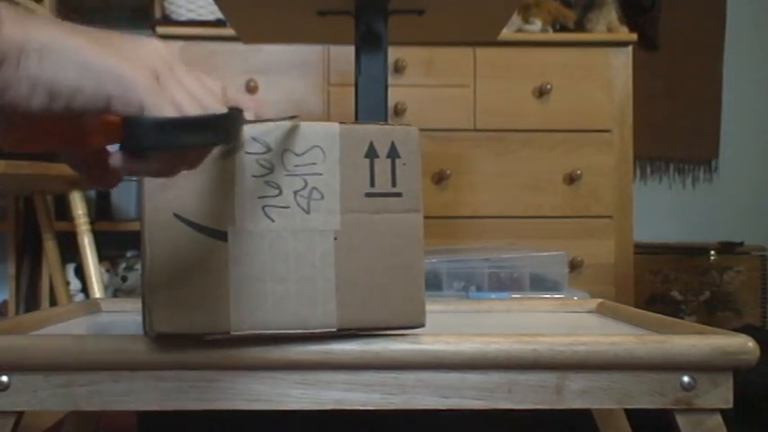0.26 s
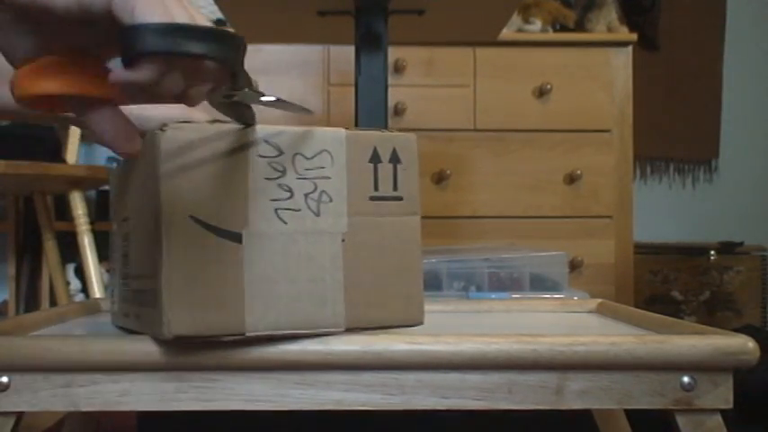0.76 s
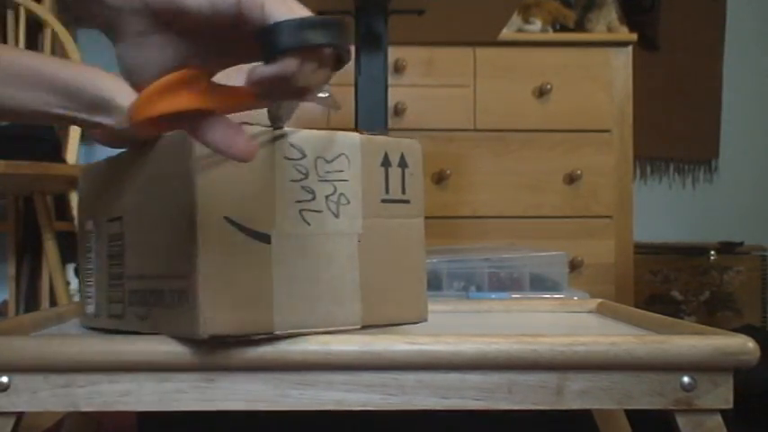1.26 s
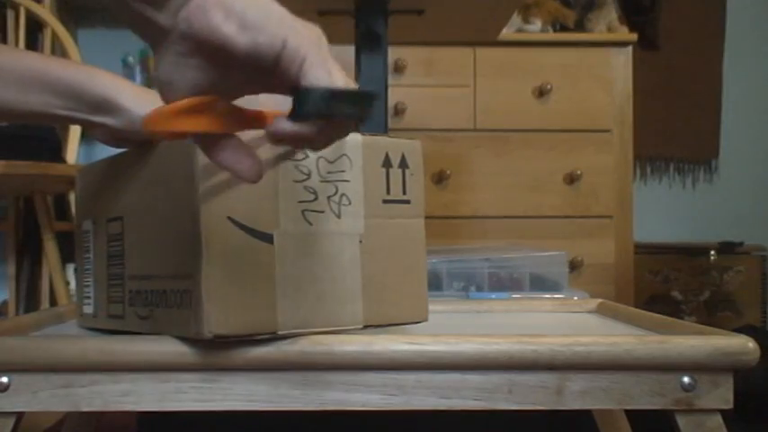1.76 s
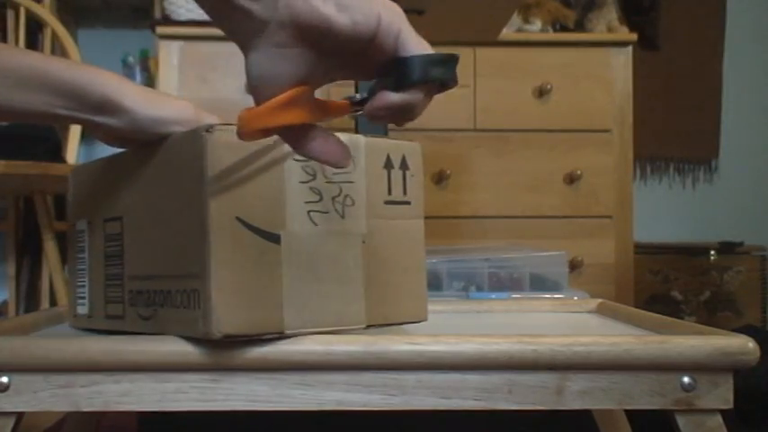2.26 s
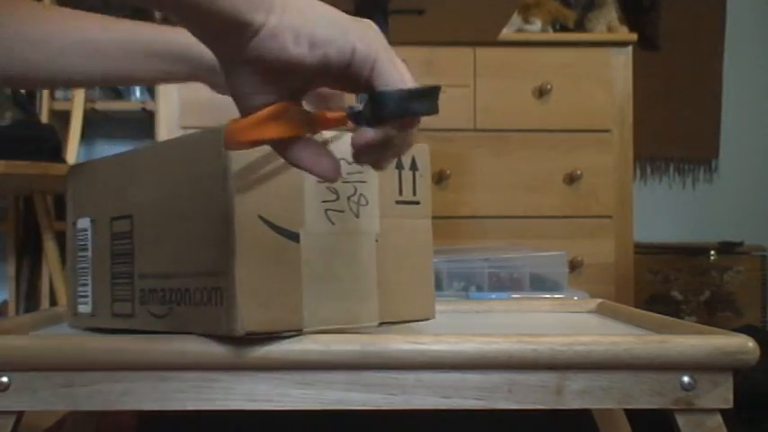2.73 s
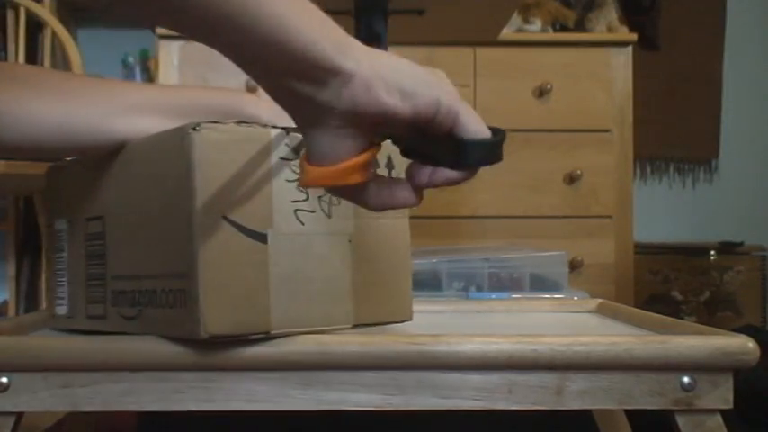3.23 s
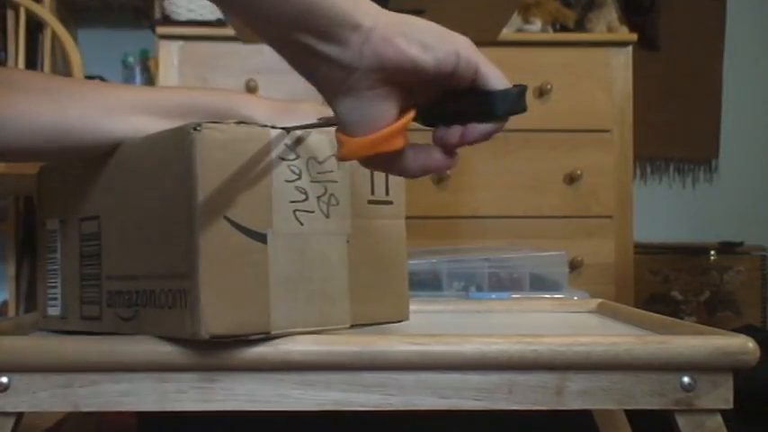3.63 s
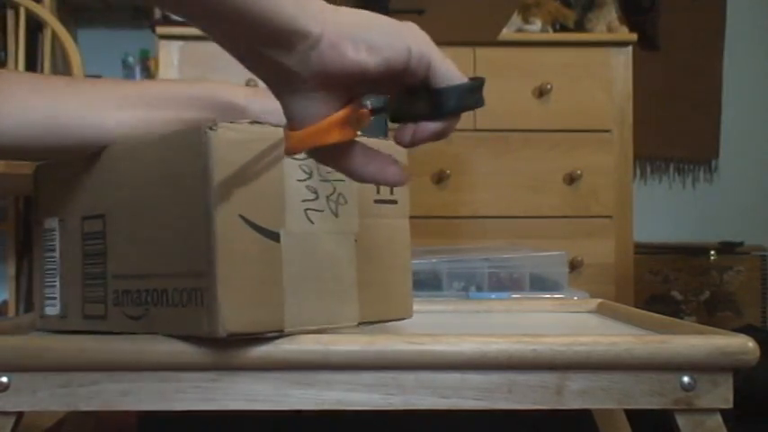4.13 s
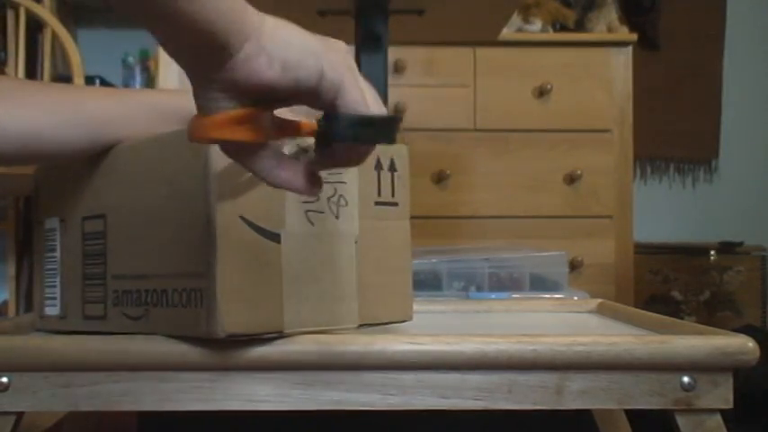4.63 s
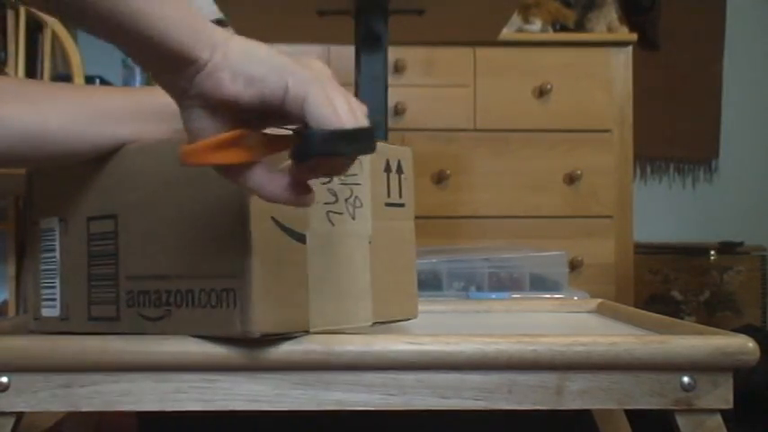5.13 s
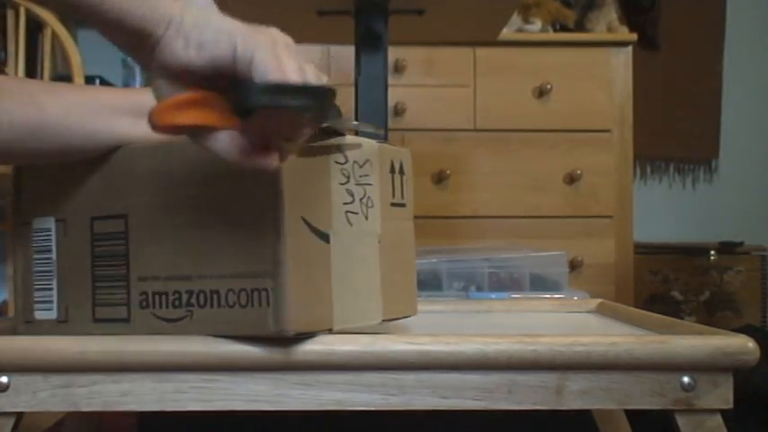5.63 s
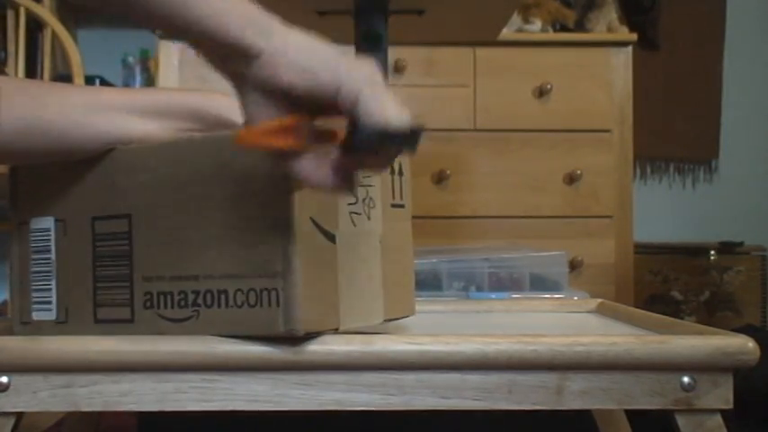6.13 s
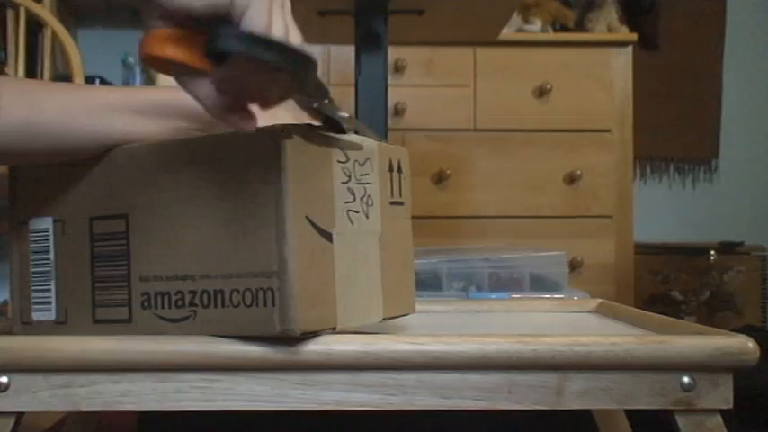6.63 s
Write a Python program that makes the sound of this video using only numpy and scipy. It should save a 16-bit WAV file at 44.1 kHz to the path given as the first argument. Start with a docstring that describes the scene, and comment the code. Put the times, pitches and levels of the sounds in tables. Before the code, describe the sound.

In a small quiet room, scissors work along the taped seam of a cardboard box on a wooden table. Hollow knocks and short rips come in uneven clusters, with a firm thump near the middle, then softer scrapes and hisses. Towards the end come crisp tape ticks, two small metallic clicks and the loudest knock. The microphone is close, with a faint low hush and a short room answer.

```python
"""In a small quiet room, a scissor blade works along the taped seam of a cardboard box on a wooden tray table.
The blade scrapes, catches and knocks the box, and slits the tape in short rips; the tape crackles,
the scissors click. Random grains and noise bursts, the forces of contact, ring filters for table,
box panels, edge, tape and steel. Each contact gets an answer from the room, over a steady hush."""
import sys
import numpy as np
from scipy import signal
from scipy.fft import rfft, irfft, next_fast_len
from scipy.io import wavfile
from scipy.ndimage import uniform_filter1d

SR = 44100
rng = np.random.default_rng(int(sys.argv[2]) if len(sys.argv) > 2 else 0)


def pcm_store(signal):
    """Save signal as 16-bit PCM."""
    levels = np.round(np.clip(np.atleast_2d(signal), -1, 1) * 32767)
    wavfile.write(sys.argv[1], SR, levels.astype(np.int16).T)


N = 303219  # length of the scene in samples
SIZE = 16384  # samples in one contact or one filter
T = np.arange(SIZE) / SR  # time within a contact, s
HZ = np.fft.rfftfreq(SIZE, 1 / SR)

# the blade catches and knocks the box: start_s, level_db (of the panels), panel_hz (strongest panel pitch),
# table_db (weight on the table, against the panels), sharp_db (edge and tape louder by this much)
BLADE_KNOCKS = [(0.012, -65.5, 258, 15.5, -7), (0.126, -58, 560, 1, -13), (0.644, -43.5, 373, -31, -8),
                (0.679, -44, 382, -9, -15), (0.726, -46, 420, -10, -6), (0.842, -45.5, 327, -3, 6),
                (0.985, -49, 530, -9, 3), (1.113, -44, 377, -4.5, -22), (1.135, -40, 393, -23, -20),
                (1.256, -44.5, 494, -3.5, -12), (1.439, -55.5, 340, 7, -2), (1.504, -53, 269, -15, 14.5),
                (1.889, -51, 290, 1.5, 7), (2.302, -40.5, 375, -4, 1), (2.511, -51, 323, 2.5, 8),
                (2.669, -58.5, 583, -6, 12), (2.855, -34, 266, -2.5, -5), (2.88, -35.5, 367, -18, -22),
                (3.935, -60, 700, -5, 13), (4.02, -56.5, 595, -0.5, 7), (4.172, -56, 358, -1.5, 14.5),
                (4.257, -50.5, 412, -4, -3), (4.383, -57, 526, 5.5, -12), (4.556, -60, 261, 2, 17),
                (4.665, -59.5, 290, 4.5, 6), (4.787, -57.5, 283, 9, 13), (5.246, -38, 540, 4.5, 14),
                (5.81, -48.5, 600, -16, -12), (5.886, -51, 520, -4.5, 3), (6.272, -46, 390, 3.5, -10),
                (6.471, -28, 414, -25, 1.5)]
# resonances of the box panels: pitch_hz, width_hz, level_db
PANEL_MODES = [(235, 32, 4), (292.5, 21, 3.5), (349.6, 21, 1), (382, 27.5, 2), (430, 30, -5.5),
               (507.4, 25, 0.5), (577, 12.5, -4), (616, 15, -36)]
# tone of the tape: pitch_hz, level_db (per Hz)
TAPE_TONE = [(1200, -8.5), (3000, 3), (4500, 4.5), (6300, 7.5), (9000, 4.5), (11000, 0), (14000, 7.5),
             (16500, 5)]
# tone of the fine, high fizz: pitch_hz, level_db (per Hz)
FIZZ_TONE = [(3000, -7.5), (9000, -4), (11500, -4.5), (13000, 4.5), (14500, 3.5), (16500, -7.5)]


def amp(db):
    """Turn decibels into a gain."""
    return 10 ** (np.asarray(db) / 20)


def unit(x):
    """Scale x to an average strength (rms) of 1."""
    return x / np.sqrt(np.mean(x ** 2) + 1e-20)


def along(points, hz):
    """Read a curve of (Hz, value) points on a logarithmic pitch axis."""
    point_hz, value = np.transpose(points)
    return np.interp(np.log(hz + 1), np.log(point_hz), value)


def filtered(x, gain):
    """Multiply x by a gain that depends on frequency."""
    n = x.shape[-1]
    padded = next_fast_len(n + SIZE)
    spectrum = rfft(x, padded) * gain(np.fft.rfftfreq(padded, 1 / SR))
    return irfft(spectrum, padded)[..., :n]


def stereo(pair, width):
    """Use two unrelated signals as middle and side; width sets how strong the side is at each pitch."""
    middle = pair[0]
    side = filtered(pair[1], lambda hz: amp(along(width, hz)))
    return np.array([middle + side, middle - side])


def air():
    """The room's steady hush: shaped noise that comes from all sides."""
    # tone of the hush: pitch_hz, level_db (per Hz, before the overall level is set)
    hush_tone = [(15, -36), (25, -22), (124, -4.5), (445, -10), (617, -8.5), (1090, -13), (1510, -14),
                 (1640, -16.5), (2270, -17), (3230, -24), (4600, -23.5), (8370, -26.5), (10700, -28),
                 (14000, -22.5), (16500, -29)]
    # stereo width of the hush: pitch_hz, side_db (side over middle)
    hush_width = [(50, -18), (130, -5), (220, -2.5), (520, 3.5), (1500, -1), (5000, -3), (10700, 3.5),
                  (11500, -24)]
    hush = filtered(rng.standard_normal((2, N)), lambda hz: amp(along(hush_tone, hz)))
    return amp(-56) * unit(stereo(hush, hush_width))


def colour(spectrum):
    """Make a short filter with the given tone that reacts only after it is struck (minimum phase)."""
    cepstrum = irfft(np.log(amp(along(spectrum, HZ))))
    # folding the second half onto the first leaves no sound before the strike
    fold = 1 + np.sign(SIZE // 2 - np.arange(SIZE))
    return irfft(np.exp(rfft(cepstrum * fold) - cepstrum[0]))


def body(modes, centre_hz, leak_hz, falloff_db=15):
    """Damped resonances: the place of contact favours those near centre_hz; little sounds below leak_hz."""
    ring = 0
    for hz, width, db in modes:
        # each octave away from the centre costs falloff_db
        strength = amp(db - falloff_db * abs(np.log2(hz / centre_hz)))
        damping = 1j * HZ * width
        ring = ring + strength * damping / (hz * hz - HZ * HZ + damping)
    radiated = (HZ / (HZ - 1j * leak_hz)) ** 2
    return irfft(ring * radiated)


def edge(spectrum, edge_hz, boost=0.78, q=2.6):
    """An edge of cardboard or steel has one main resonance, set by where it is touched."""
    damping = 1j * HZ * edge_hz
    resonance = boost * damping / (q * (edge_hz ** 2 - HZ ** 2) + damping)
    return irfft(rfft(colour(spectrum)) * (1 + resonance))


def room(wet_db, gap=0.0053):
    """Direct sound, then after a short gap (s) the dying answer of furniture and walls."""
    # how long the room rings: pitch_hz, decay_s (time to drop by 60 dB)
    room_decay = [(100, 0.23), (400, 0.24), (1500, 0.28), (5000, 0.27), (10000, 0.25), (16000, 0.18)]
    # stereo width of the answer: pitch_hz, side_db (side over middle); the bass is nearly mono
    room_width = [(60, -15), (250, -11), (500, -6), (1000, -7), (4000, -5), (8500, -1.5), (10500, -5),
                  (11500, -30)]
    hz, t, bands = signal.stft(rng.standard_normal((2, SIZE)), SR, nperseg=256)
    decay = amp(-60 * t / along(room_decay, hz)[:, None])
    tail = signal.istft(bands * decay, SR, nperseg=256)[1][:, :SIZE]
    tail = tail * np.clip(T / gap - .5, 0, 1)  # fades in around the gap
    direct = (T == 0)
    return direct + amp(wet_db) * stereo(unit(tail), room_width) / np.sqrt(SIZE)


def grains(n, rate, spread_db):
    """Tiny slips and fibre breaks of uneven size at random moments, about rate per second."""
    sizes = amp(spread_db * np.clip(rng.standard_normal(n), -2, 2))
    sizes = sizes * rng.choice([-1, 1], n)
    happens = rng.random(n) < rate / SR
    return unit(sizes * happens)


def add(out, s, force, parts, levels_db, wet_db):
    """Mix in one contact: the force rings each part to its level over the first 30 ms."""
    # double length, so that the end of the ringing does not wrap round to the start
    heard = rfft(force, 2 * SIZE) * rfft(room(wet_db), 2 * SIZE)
    start = max(round(s * SR), 0)
    onset = round(.03 * SR)
    for part, db in zip(parts, levels_db):
        ring = irfft(heard * rfft(part, 2 * SIZE))[:, :SIZE]
        gain = amp(db) / np.std(ring.mean(0)[:onset])
        out[:, start:start + SIZE] += (gain * ring)[:, :N - start]


def box_parts(table_hz, panel_hz, edge_hz):
    """What a contact shakes: table, box panels, cardboard edge, tape."""
    # resonances of the wooden table: pitch_hz, width_hz, level_db
    table_modes = [(103.6, 28, 2.5), (127.3, 21, 5.5), (172.8, 44, 1.5), (202.6, 32, 1)]
    # tone of the cracking cardboard edge: pitch_hz, level_db (per Hz)
    crack_tone = [(200, -27), (750, 10.5), (1050, 12.5), (1400, 17), (2100, 8), (3000, 0.5), (4000, -2),
                  (6000, 8.5), (16000, -37)]
    table = body(table_modes, table_hz, leak_hz=45.6)
    panels = body(PANEL_MODES, panel_hz, leak_hz=171)
    return table, panels, edge(crack_tone, edge_hz), colour(TAPE_TONE)


def knocks():
    """The blade catches and chatters briefly; in harder knocks the first push outweighs the chatter."""
    out = np.zeros((2, N))
    push_from_db, push_grows = -44, 1  # push and chatter are equal at this level; dB of push per dB of knock
    crack_db, tape_db = -21.5, -15.5  # edge and tape against the panels, at sharpness 0
    for s, db, panel_hz, table_db, sharp_db in BLADE_KNOCKS:
        swell = (1 - np.exp(-T / 0.0012)) * np.exp(-T / 0.012)
        chatter = grains(SIZE, rate=2500, spread_db=8.5) * swell
        # the cardboard crushes over a few milliseconds
        push = rng.standard_normal(SIZE) * T * np.exp(-T / 0.0014)
        push_gain = amp(push_grows * (db - push_from_db))
        force = push_gain * unit(push) + unit(chatter)
        levels = db + np.array([table_db, 0, crack_db + sharp_db, tape_db + sharp_db])
        parts = box_parts(table_hz=184, panel_hz=panel_hz, edge_hz=1260)
        add(out, s, force, parts, levels, wet_db=-2.0)
    return out


def snaps():
    """Stretched tape lets go in thin, bright ticks, each a quickly fading burst of grains."""
    # single snaps of tape: start_s, level_db, thin_db (fizz up and snap down by this much)
    tape_snaps = [(0.111, -71, -13), (0.301, -67, -5), (0.804, -68.5, -12), (1.6854, -71, 2),
                  (1.9265, -60.5, -1), (2.4425, -65, 6), (3.7176, -70, -4), (5.0692, -66, -11),
                  (5.4842, -68, -10), (5.747, -68, 3), (5.995, -66.5, -4), (6.2838, -67, 12),
                  (6.324, -60.5, 11.5), (6.386, -59, -12), (6.433, -59.5, 7.5), (6.534, -56, 8.5),
                  (6.6105, -61, -2), (6.8596, -60, 4)]
    out = np.zeros((2, N))
    parts = (colour(TAPE_TONE), colour(FIZZ_TONE))
    for s, db, thin_db in tape_snaps:
        crackle = grains(SIZE, rate=2800, spread_db=5.0) * np.exp(-T / 0.0026)
        add(out, s, crackle, parts, [db - thin_db, db + thin_db], wet_db=4.0)
    return out


def friction(part, swell, rate, spread_db):
    """Slips ring one sounding part; their strength follows the swell of the stroke."""
    response = signal.fftconvolve(room(wet_db=0.0), part[None], axes=1)[:, :SIZE]
    response = response / np.linalg.norm(response.mean(0))
    force = swell * grains(SIZE, rate, spread_db)
    return signal.fftconvolve(force[None], response, axes=1)


def slide():
    """Pressure rubs the panels; tape hisses under the blade, and where the blade bites, it rasps and fizzes."""
    # strokes along the seam: peak_s (height of the stroke), level_db (of the hiss), length_s,
    # pressure_db (rub over hiss), bite_db (rasp and fizz louder by this much)
    blade_strokes = [(0.185, -74.5, 0.039, 19.5, -3), (0.61, -50, 0.12, -13, -8.5),
                     (0.705, -62.5, 0.13, 11.5, -21), (1.165, -53, 0.11, 1, -14),
                     (1.24, -61, 0.057, 15, -13), (2.341, -54, 0.078, 5, -7), (2.484, -61.5, 0.07, 0, 0.5),
                     (2.619, -75.5, 0.16, 16, -10), (2.987, -52, 0.079, -6.5, -0.5),
                     (3.245, -53.5, 0.088, -14, -6), (3.763, -57, 0.046, -11, 8.5),
                     (4.049, -64.5, .12, -9, 1), (4.188, -60, 0.15, -22, 1.5), (4.431, -70, 0.15, 10, 3.5),
                     (4.718, -61.5, 0.084, 2.5, 5.5), (4.834, -48, 0.043, 0.5, -2),
                     (4.943, -60.5, 0.067, 0, 5), (5.087, -55.5, 0.074, -4, -1.5),
                     (5.244, -45, 0.064, -4, -1.5), (5.272, -44.5, 0.055, -12, -5),
                     (5.528, -60.5, 0.094, -4, 2), (5.791, -52.5, .055, -1.5, 2.5),
                     (5.9, -62.5, 0.17, 3.5, 1), (6.17, -57, .06, -19, 2.5), (6.335, -64.5, 0.11, 8.5, 5),
                     (6.419, -61.5, 0.047, 6, -5.5), (6.537, -74, .055, 1, -10)]
    # tone of the rasp: pitch_hz, level_db (per Hz)
    rasp_tone = [(200, -8), (700, -2), (1400, -1.5), (2000, -5), (3000, -2.5), (4000, -19), (7000, -18),
                 (16000, -43)]
    # tone of the hiss: pitch_hz, level_db (per Hz)
    hiss_tone = [(1500, 0.5), (3000, 0), (4200, 4.5), (6300, 2.5), (9000, 0), (11000, -4.5), (16000, -7)]
    rise_share = .57  # the rise's share of a stroke's length; the rest is its fall
    uneven_db, uneven_s = 3, 0.0073  # the blade sticks and frees itself: depth and duration
    out = np.zeros((2, N + 3 * SIZE))  # spare room at both ends
    t = T - T.mean()
    knock_s, _, knock_hz, _, _ = np.transpose(BLADE_KNOCKS)
    for s, db, length, pressure_db, bite_db in blade_strokes:
        spread = length * np.where(t < 0, rise_share, 1 - rise_share)
        swell = np.exp(-.5 * (t / spread) ** 2)
        wobble = uniform_filter1d(rng.standard_normal(SIZE), round(uneven_s * SR))
        swell = swell * amp(uneven_db * unit(wobble))
        # the blade travels from one catch to the next
        panel_hz = np.interp(s, knock_s, knock_hz)
        # pressing harder rasps more and smothers the fizz (dB per dB)
        rasp_db = db + bite_db - 1 + 0.075 * pressure_db
        fizz_db = db + bite_db - 4 - 0.042 * pressure_db
        panels = body(PANEL_MODES, panel_hz, leak_hz=179)
        rub = amp(db + pressure_db) * friction(panels, swell, rate=430, spread_db=7)
        rasp = amp(rasp_db) * friction(edge(rasp_tone, edge_hz=1800), swell, rate=800, spread_db=6.0)
        hiss = amp(db) * friction(colour(hiss_tone), swell, rate=2500, spread_db=5.0)
        fizz = amp(fizz_db) * friction(colour(FIZZ_TONE), swell, rate=1200, spread_db=17)
        start = round(s * SR) + SIZE // 2
        out[:, start:][:, :2 * SIZE - 1] += rub + rasp + hiss + fizz
    return out[:, SIZE:SIZE + N]


def rips():
    """The tape tears in a dense run of breaks that stops as the blade comes to rest."""
    # the tape gives way: start_s, level_db (of the panels), table_hz and panel_hz (strongest pitches),
    # table_db (weight on the table, against the panels), tape_db (tape over the panels), length_s
    tape_rips = [(0.317, -37, 196, 405, -4, -26, 0.038), (0.331, -39, 115, 496, 1, -18, 0.021),
                 (1.949, -41.5, 206, 250, -2.5, 4.5, 0.027), (2.317, -38.5, 127, 514, -15, -34, 0.036),
                 (2.85, -37, 170, 250, -6, -20, 0.029), (5.252, -44, 104, 576, -8, -11, 0.026)]
    out = np.zeros((2, N))
    for s, db, table_hz, panel_hz, table_db, tape_db, length in tape_rips:
        run = (1 - np.exp(-T / 0.00061)) * np.exp(-(T / length) ** 2)
        force = grains(SIZE, rate=2500, spread_db=4.0) * run
        # the more tape tears, the more the cardboard edge cracks (dB per dB)
        crack_db = -3.5 + 0.45 * tape_db
        levels = db + np.array([table_db, 0, crack_db, tape_db])
        add(out, s, force, box_parts(table_hz, panel_hz, edge_hz=2600), levels, wet_db=-4.0)
    return out


def clicks():
    """Steel meets steel; the hand damps the ring, whose pitch depends on where the blades touch."""
    # the two blades click together: start_s, level_db, ring_hz (strongest ring)
    blade_clicks = [(0.324, -46.5, 3100), (6.132, -49.5, 6500), (6.2974, -46, 2540)]
    # tone of the steel: pitch_hz, level_db
    steel_tone = [(800, -20), (1500, -9), (1850, 0), (2100, 0), (2600, -9), (4200, -11), (6440, -6),
                  (8500, -11), (11000, -17), (14000, -14), (16500, -21)]
    out = np.zeros((2, N))
    for s, db, ring_hz in blade_clicks:
        blade = edge(steel_tone, ring_hz, boost=4.9, q=9.2)
        force = rng.standard_normal(SIZE) * np.exp(-T / 0.0022)
        add(out, s, force, [blade], [db], wet_db=-2.5)
    return out


def scene():
    """All the work on the box over the room's hush."""
    return air() + knocks() + snaps() + slide() + rips() + clicks()


def record(dry):
    """Keep only what lies below the top of the band, 16700 Hz."""
    return filtered(dry, lambda hz: hz < 16700)


dry = scene()
out = record(dry)
pcm_store(out)
```